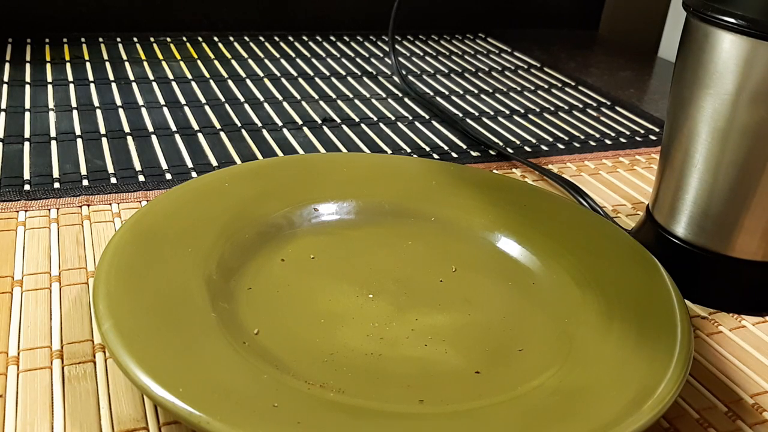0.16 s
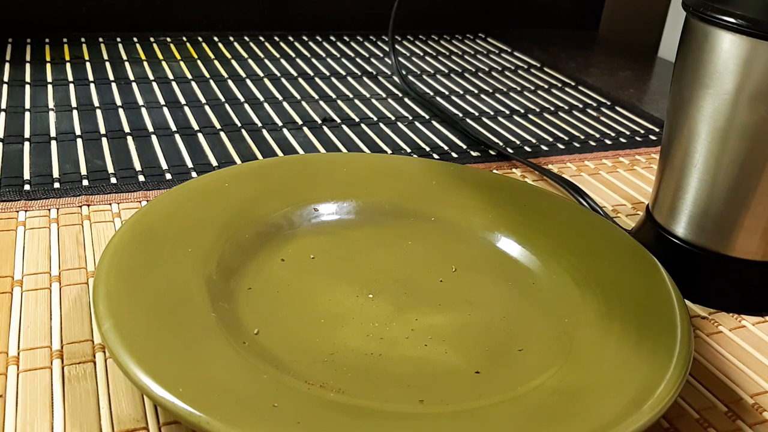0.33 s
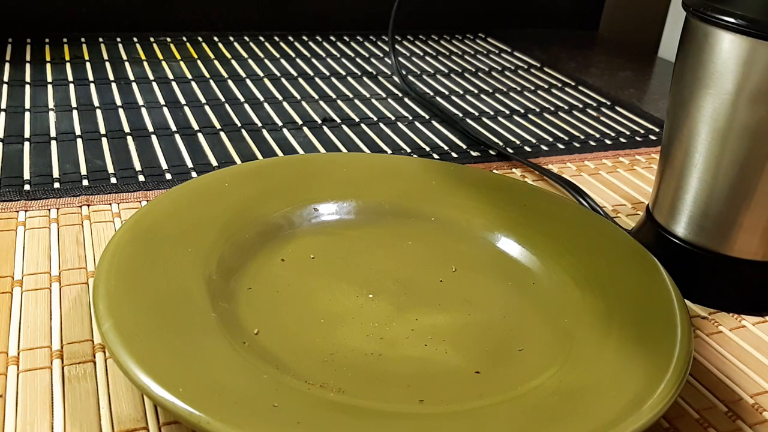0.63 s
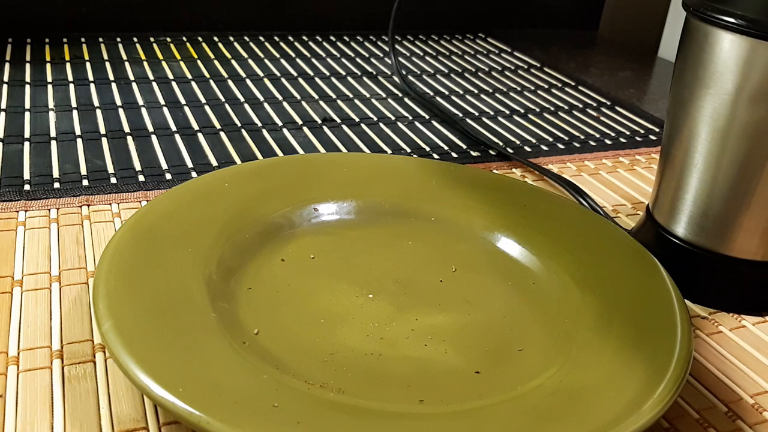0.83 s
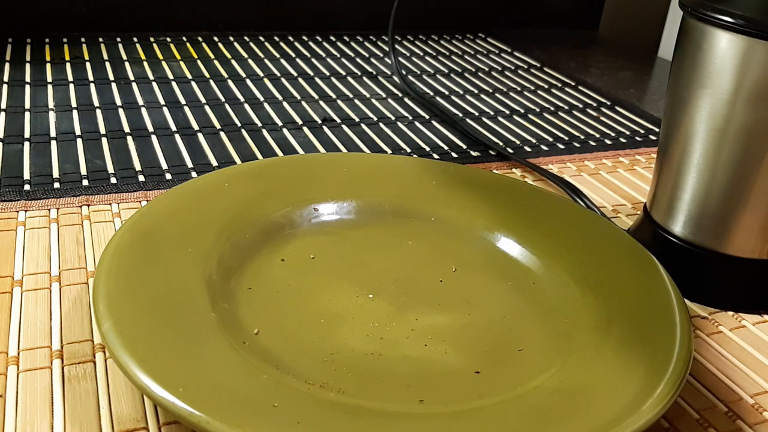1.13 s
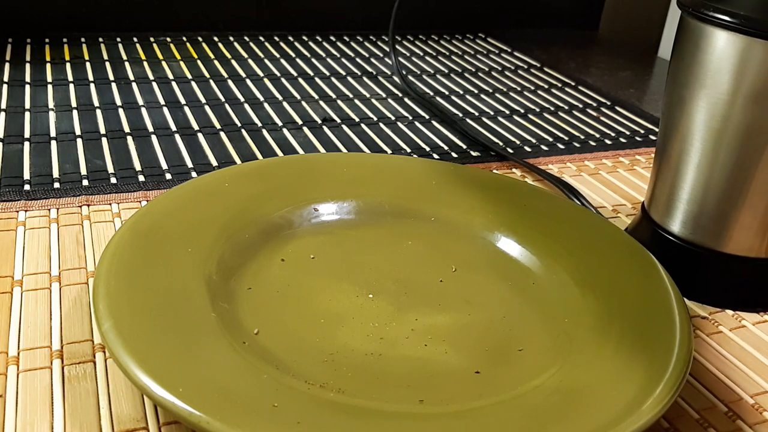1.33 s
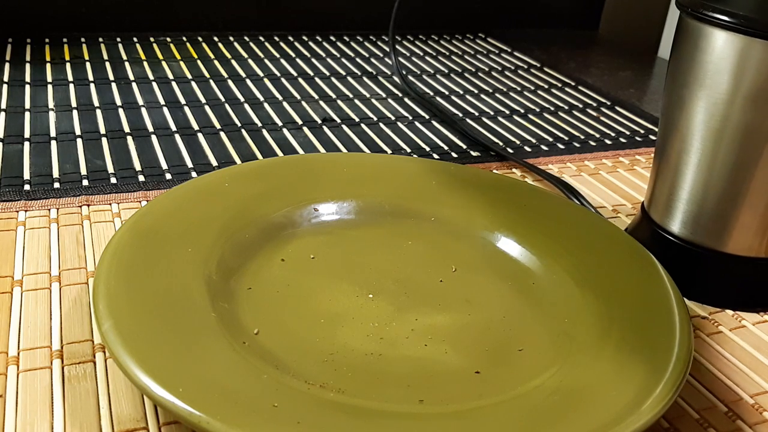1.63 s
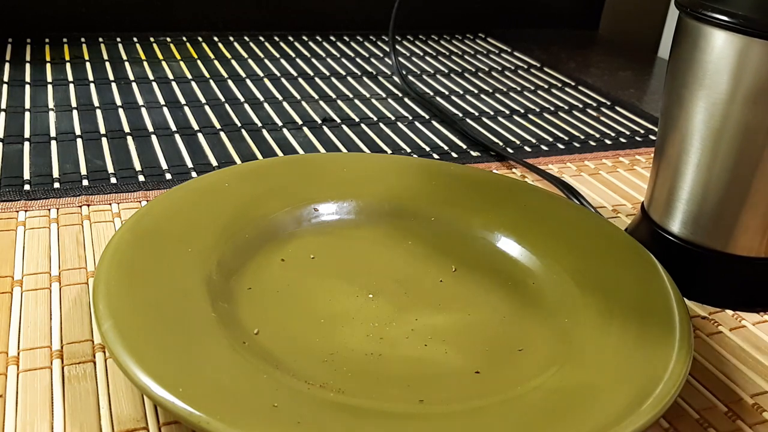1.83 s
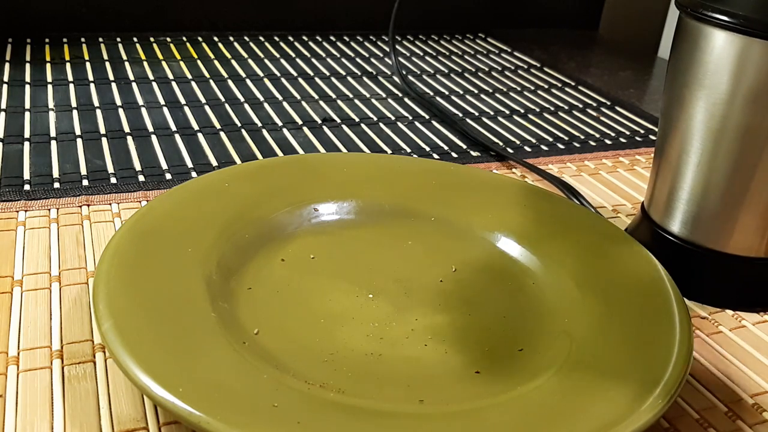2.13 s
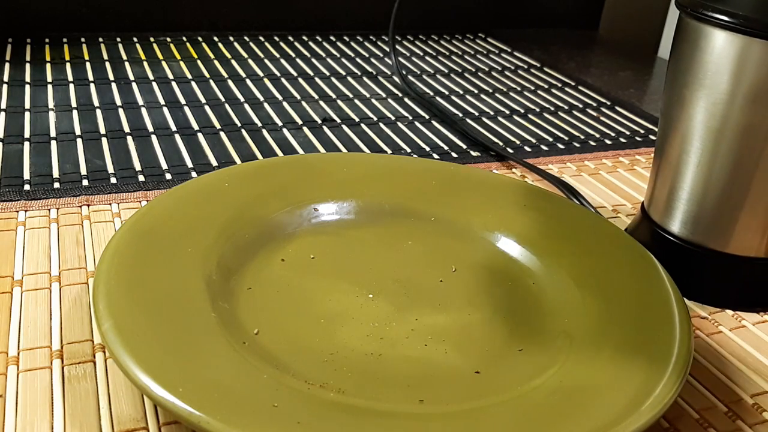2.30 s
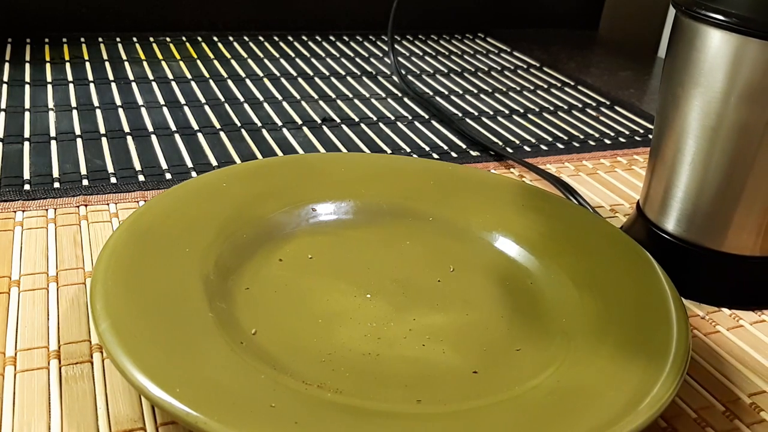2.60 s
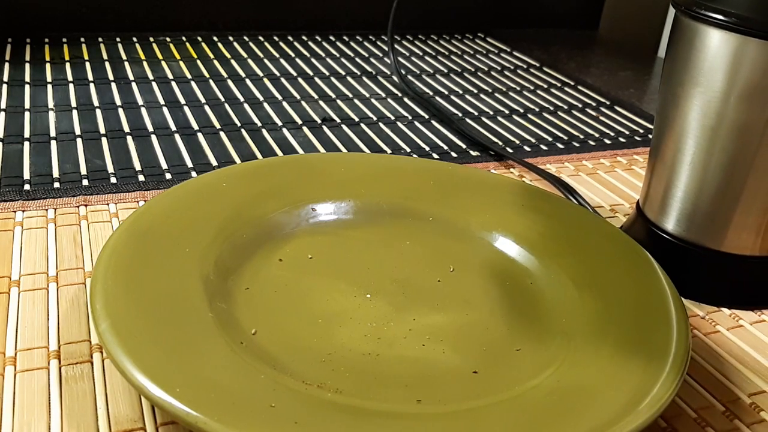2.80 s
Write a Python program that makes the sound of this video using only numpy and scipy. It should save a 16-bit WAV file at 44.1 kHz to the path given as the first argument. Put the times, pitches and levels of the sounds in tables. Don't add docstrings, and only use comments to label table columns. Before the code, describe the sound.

Close up on a kitchen table, a spice grinder hums and clatters, cuts out after just over a second, near silence follows with a faint low creak, then the motor revs up with louder rattling and cracking.

```python
import sys
import numpy as np
from scipy import signal
from scipy.fft import rfft, irfft
from scipy.io import wavfile
from scipy.ndimage import uniform_filter1d, map_coordinates

SR = 44100
rng = np.random.default_rng(int(sys.argv[2]) if len(sys.argv) > 2 else 0)


def rack_gain(trim_db):
    fader = np.asarray(trim_db, float)
    return 10 ** (fader / 20)


def waveform_to_disk(signal):
    frames = np.transpose(np.atleast_2d(signal))
    scaled = np.clip(frames, -1, 1) * 32767
    samples = np.round(scaled).astype(np.int16)
    wavfile.write(sys.argv[1], SR, samples)


N = 130095
T = np.arange(N) / SR
FIRST_RUN, SECOND_RUN = T < 2, T > 2
STOP_S, START_S, SLOW_UNTIL_S = 1.3623, 2.427, 2.565


def read(table, col):
    table = np.array(table, float)
    return np.interp(T, table[:, 0], table[:, col])


def unit(x):
    return x / np.sqrt(np.mean(x ** 2))


def walk(rate):
    hold = max(int(SR / rate), N // 400 + 1)
    steps = np.repeat(rng.standard_normal(400), hold)[:N]
    return unit(uniform_filter1d(uniform_filter1d(steps, hold), hold))


def colour(x, points, peaks=()):
    hz = np.arange(4097) * SR / 8192 + 1
    points = np.array(points, float)
    db = np.interp(np.log(hz), np.log(points[:, 0] + 1), points[:, 1])
    for centre, width, gain in peaks:
        db = db + gain / (1 + (2 * (hz - centre) / width) ** 2)
    cepstrum = irfft(db * np.log(10) / 20)
    cepstrum[1:4096] *= 2
    cepstrum[4097:] = 0
    return signal.fftconvolve(x, irfft(np.exp(rfft(cepstrum))))[:N]


def resonate(x, points, peaks):
    impulse = 1. * (T == 0)
    return colour(x, points, peaks) / np.sqrt(np.sum(colour(impulse, points, peaks) ** 2))


def split(x, hz):
    low = signal.sosfiltfilt(signal.butter(3, hz, fs=SR, output="sos"), x)
    return low, x - low


def high_pass(x, hz):
    return signal.sosfilt(signal.butter(1, hz, "high", fs=SR, output="sos"), x)


def running():
    first = np.clip((STOP_S - T) / .017 + 1, 0, 1)
    second = np.clip((T - START_S) / .003, 0, 1)
    return first + second


# time in seconds, speed in Hz (turns per second), hum level in dB.
SHAFT_RUN = [(0, 340.6, -36), (.94, 343.7, -37.5), (.995, 333, -33), (1.04, 328, -38), (1.062, 303, -44.5),
             (1.085, 300.3, -40), (1.105, 292.1, -66), (1.37, 90, -78), (2.43, 50.04, -64),
             (2.52, 107.9, -31), (2.56, 120.4, -25.5), (2.605, 129.4, -20), (2.66, 134.2, -32.5),
             (2.71, 211.8, -65), (2.77, 250, -30.5), (2.82, 274.2, -52), (2.87, 298, -36), (2.95, 322, -61)]


def shaft_phase():
    return 2 * np.pi * np.cumsum(read(SHAFT_RUN, 1) * (1 + .004 * walk(9.6))) / SR


# multiple of the shaft speed, level relative to the hum in dB.
HUM_HARMONICS = [(2, -24.5), (3, -20), (4, -19.5)]


def hum(phase):
    tone = np.sin(phase)
    for multiple, db in HUM_HARMONICS:
        tone = tone + rack_gain(db + walk(31)) * np.sin(multiple * phase)
    level_db = read(SHAFT_RUN, 2) + 1.6 * walk(30.1)
    return np.sqrt(2) * tone * rack_gain(level_db) * running()


# time in seconds, level in dB, table shaking in dB, fine dust in dB.
FIRST_LOAD = [
    (0, -31, -8.5, 3),
    (.46, -34, -1.5, 0),
    (.75, -35.5, -3, 1),
    (1.19, -33, -2.5, 3.5),
    (1.3, -31.5, -2.5, -4),
    (1.37, -31, 0, -3),
]
# time in seconds, level in dB, table shaking in dB, fine dust in dB.
SECOND_LOAD = [(2.427, -34.5, 2.5, -7), (2.455, -34, 2, 2.5), (2.5, -36, 2.5, -4.5), (2.53, -34.5, 9, -6),
               (2.564, -25.5, 3.5, -7), (2.573, -14.5, -8.5, -3), (2.672, -15.5, -12.5, -4),
               (2.75, -21.5, -10.5, -4), (2.782, -25, -13, -0.5), (2.81, -23, -10.5, -5),
               (2.856, -29, -11.5, -0.5), (2.95, -27.5, -9.5, 2.5)]


def load(col):
    return np.where(FIRST_RUN, read(FIRST_LOAD, col), read(SECOND_LOAD, col))


def grit():
    chance, sign, size = rng.random((3, N))
    hits = chance < 5000 / SR
    size_db = -4.5 * np.log(1 - .995 * size)
    return unit(hits * np.sign(sign - .5) * rack_gain(size_db))


# frequency in Hz, level in dB.
CUP_CURVE = [(500, -30.5), (900, -4), (1320, -3.5), (1600, -8), (2800, -1.5), (6900, -2.5), (7700, -6),
             (10500, -3.5), (11500, -5.5), (15000, -2)]
# frequency in Hz, width in Hz, gain in dB.
CUP_MODES = [(1230, 51, 3.5), (1319, 22, 11), (3700, 560, 3), (5400, 130, 1.5), (7235, 440, 0.5),
             (12100, 670, 2.5)]
# frequency in Hz, width in Hz, gain in dB.
SLOW_KNOCK_MODES = [(2070, 1100, 7.5), (3800, 2000, 2)]


def cup(blows, dust):
    low, high = split(resonate(blows, CUP_CURVE, CUP_MODES), 7600)
    slow = low * SECOND_RUN * (T < SLOW_UNTIL_S)
    low = low - slow + colour(slow, [(1, 0), (SR, 0)], SLOW_KNOCK_MODES)
    return low + high * dust


# frequency in Hz, level in dB.
TABLE_CURVE = [(24, -64), (40, -30.5), (76, -34), (124, -9), (223, -13), (389, -3), (474, -3.5), (927, -6),
               (2000, -17), (2600, -42.5), (4400, -120)]
# frequency in Hz, width in Hz, gain in dB.
TABLE_MODES = [(131, 49, 2), (195, 9, 2.5), (328, 180, 6.5), (416, 11, 5.5), (585, 16, 5)]
# frequency in Hz, level in dB.
RESTART_TABLE_CURVE = [(30, -23), (60, -22.5), (124, -7), (267, -12.5), (430, -9.5), (750, -9), (2000, -23),
                       (3000, -56)]
# frequency in Hz, width in Hz, gain in dB.
RESTART_TABLE_MODES = [(129, 30, 6), (204.7, 23, 8), (250, 39, 3.5), (338, 110, 6.5), (426.4, 21, 7),
                       (506, 19, 5), (1104, 19, 12), (1300, 75, 4.5)]


def table_top(push):
    first = resonate(push * FIRST_RUN, TABLE_CURVE, TABLE_MODES)
    second = resonate(push * SECOND_RUN, RESTART_TABLE_CURVE, RESTART_TABLE_MODES)
    return first + second


# start in seconds, peak level in dB, thud in dB, ring frequency in Hz.
FIRST_CRACKS = [(0.0127, -14, -14.5, 3800), (0.066, -50, -31.5, 7230), (0.0959, -16.5, -35, 7200),
                (0.12, -21, -13, 3480), (0.141, -12.5, -10, 6300), (0.2088, -13, -23, 3530),
                (0.3257, -17, -14, 6260), (0.3623, -16.5, -12, 3700), (0.4371, -22, -33, 5900),
                (0.4535, -30.5, -20.5, 5790), (0.5625, -24, -27, 6490), (0.579, -16.5, -31, 7100),
                (0.6647, -14.5, -28, 8400), (0.7337, -18, -33.5, 3700), (0.7706, -22.5, -27.5, 6100),
                (0.796, -20.5, -27, 4900), (0.8159, -21, -20.5, 6300), (0.861, -27.5, -27, 6800),
                (0.8838, -15, -26, 6660), (0.9402, -17, -30, 6960), (0.9934, -16, -18.5, 6400),
                (1.0228, -16.5, -35, 6100), (1.0967, -6, -18, 6050), (1.1573, -13.5, -33, 6100),
                (1.232, -13, -14.5, 7050), (1.2711, -12.5, -11, 5950), (1.3201, -15, -4, 5700),
                (1.3462, -21, -8, 3800)]
# start in seconds, peak level in dB, thud in dB, ring frequency in Hz.
SECOND_CRACKS = [(2.4352, -32, -2.5, 6980), (2.4535, -27.5, -8, 5240), (2.5163, -22, -28, 5330),
                 (2.5711, -10.5, -28, 6430), (2.594, -8, -2.5, 5360), (2.648, -4.5, -29, 6950),
                 (2.6611, -4.5, -14, 6740), (2.6823, -8.5, -42, 6590), (2.723, -6, -31, 6000),
                 (2.7975, -16.5, -41, 5400), (2.8924, -14, -31, 6430)]
ALL_CRACKS = list(FIRST_CRACKS) + list(SECOND_CRACKS)
SNAP_DELAY_S = .0008


def bursts(thud_share, snap_s, scatter_db):
    envelope = np.zeros(N)
    squeezed = (T < START_S) | (T > SLOW_UNTIL_S + .02)
    for start, peak_db, thud_db, _ in ALL_CRACKS:
        snap_at = start + SNAP_DELAY_S
        age = np.abs(T - snap_at)
        after = np.exp(-age / snap_s) + rack_gain(scatter_db) * np.exp(-age / .007)
        lead_db = -17 + 7 * (peak_db < -14.8)
        before = rack_gain(lead_db) * np.exp(-age / .007) * squeezed
        envelope += rack_gain(peak_db + thud_share * thud_db) * np.where(T >= snap_at, after, before)
    return envelope


def rings():
    out, age = np.zeros(N + 4096), T[:4096]
    for start, peak_db, _, hz in ALL_CRACKS:
        slow = START_S < start < START_S + .12
        half_width_hz = 700 / (7 if slow else 2)
        decay_s = .016 if slow else .007
        edges = [hz - half_width_hz, hz + half_width_hz]
        sos = signal.butter(1, edges, "band", fs=SR, output="sos")
        band = signal.sosfilt(sos, rng.standard_normal(4096))
        at = int((start + SNAP_DELAY_S) * SR)
        out[at:at + 4096] += rack_gain(peak_db - 13 + 10 * slow) * unit(band) * np.exp(-age / decay_s)
    return out[:N]


def spice(phase):
    surge_db = .5 * walk(18) * (T < STOP_S)
    force = rack_gain(load(1) + surge_db + 2.2 * walk(70)) * running()
    dust = rack_gain(load(3) + 2.2 * walk(34.93))
    snap = rack_gain(2) * bursts(0, .0009, -5) / 2
    thud = rack_gain(4) * bursts(.95, .0018, -15.5) / 2
    push = force * rack_gain(load(2) - 7.5 * FIRST_RUN) + thud
    count, places = 7, []
    for k in range(count):
        turn = 1 + .36 * np.sin(phase + 2 * np.pi * k / count)
        blows = grit() * force * rack_gain(.5 + 2.87 * walk(45)) * turn
        blows = blows + snap * rng.standard_normal(N)
        place = cup(blows, dust) + table_top(grit() * push) + rings()
        places.append(place / np.sqrt(count))
    return places


def room(x):
    age = T[:SR // 2]

    def decay(t60_s):
        tail = unit(rack_gain(-60 * age / t60_s) * (age > .004))
        return rack_gain(-6.5) * tail + rack_gain(-.5) * unit(np.exp(-age / .0033))

    low, high = split(rng.standard_normal((2, len(age))), 7500)
    mid, side = (low * decay(.35) + high * decay(.22)) / np.sqrt(len(age))
    side = high_pass(side, 696)
    return np.array([signal.fftconvolve(x, mid + sign * side)[:N] for sign in (1, -1)])


def hand():
    press_hz, press_s, rise_s = 182, 2.33, .037
    sos = signal.butter(3, [press_hz * .8, press_hz * 1.5], "band", fs=SR, output="sos")
    creak = unit(signal.sosfilt(sos, rng.standard_normal(N)))
    return creak * rack_gain(-58.5) * np.clip((T - press_s) / rise_s, 0, 1)


# frequency in Hz, level in dB.
FRIDGE_LINES = [(188.4, -71.5), (253.0, -73.5), (328.4, -67), (473.7, -77), (565.2, -92.5), (613.7, -80.5),
                (705.2, -82), (1184, -96), (1244, -94), (2013, -101), (3499, -91), (3618, -97), (6643, -99),
                (6783, -91)]


def fridge():
    drone = 0
    for hz, db in FRIDGE_LINES:
        quieter_db = 6 * (hz > 6000) * (T < 2.05)
        flicker_db = 3 * walk(26) / (1 + (hz > 3000))
        turns = hz * T + rng.random() + .15 * rng.random((2, 1))
        drone = drone + np.sqrt(2) * rack_gain(db - 1 - quieter_db + flicker_db) * np.sin(2 * np.pi * turns)
    return drone


# frequency in Hz, level in dB.
AIR_CURVE = [(30, -31.5), (90, -17.5), (330, -3.5), (800, -21), (1100, -31.5), (2600, -40.5), (6900, -42.5),
             (7400, -46)]
# frequency in Hz, width in Hz, gain in dB.
AIR_MODES = [(3520, 250, 7), (6940, 320, 4.4)]


def air():
    mid = colour(rng.standard_normal(N), AIR_CURVE, AIR_MODES)
    side = high_pass(colour(rng.standard_normal(N), AIR_CURVE, AIR_MODES), 400)
    both = mid + np.array([[1], [-1]]) * side
    return rack_gain(-65) * both / np.std(mid) * rack_gain(.52 * walk(7.2))


def scene():
    phase = shaft_phase()
    rattle = sum(place + room(place) for place in spice(phase))
    left, right = rack_gain(-3.5) * rattle + hum(phase)
    late_s = .00016
    left = rack_gain(-1) * map_coordinates(left, [(T - late_s) * SR], mode="mirror")
    return np.array([left, right]) + fridge() + air() + hand()


def band_limit(x):
    return signal.sosfilt(signal.butter(12, 15850, fs=SR, output="sos"), x)


def record(dry):
    x = high_pass(dry, 40)
    x = signal.sosfilt(signal.ellip(10, .2, 70, 15900, fs=SR, output="sos"), x)
    mix = np.clip(x, -1, 1)
    return band_limit(mix)


dry = scene()
out = record(dry)
waveform_to_disk(out)
```